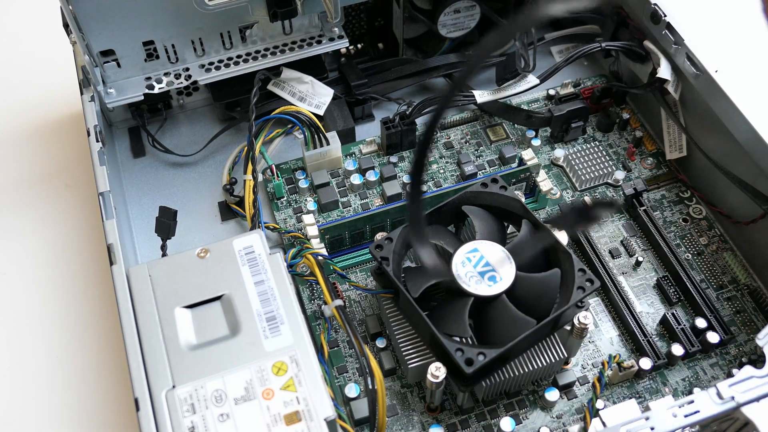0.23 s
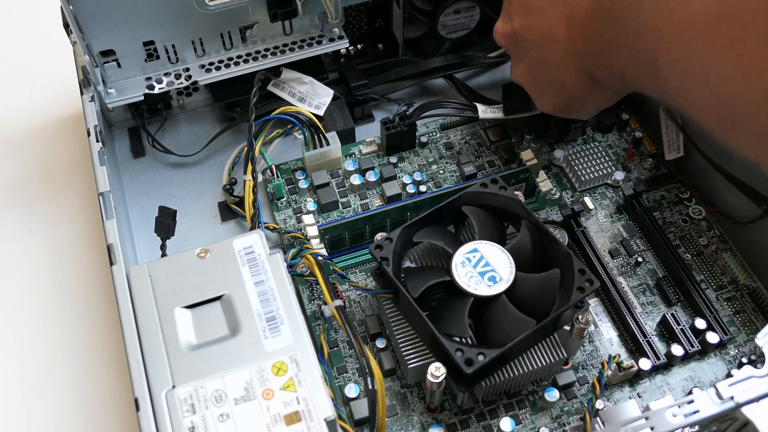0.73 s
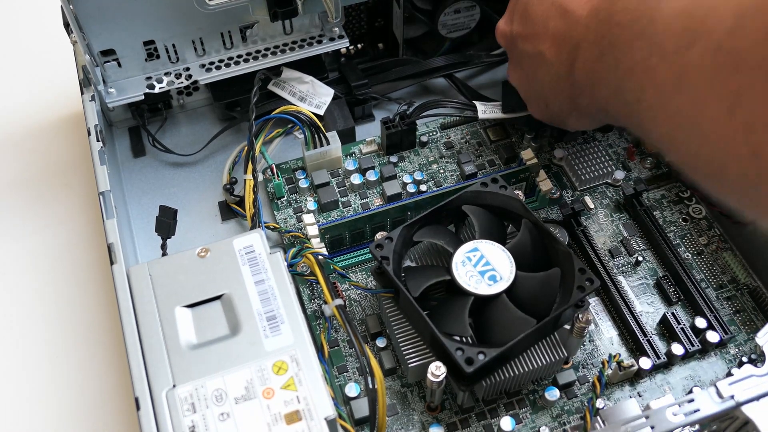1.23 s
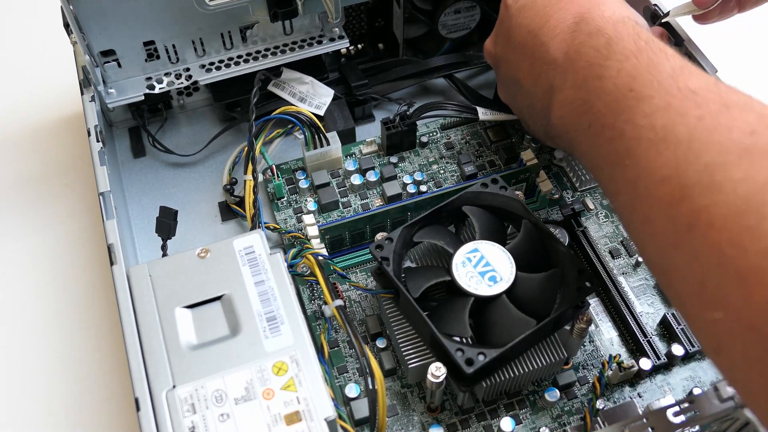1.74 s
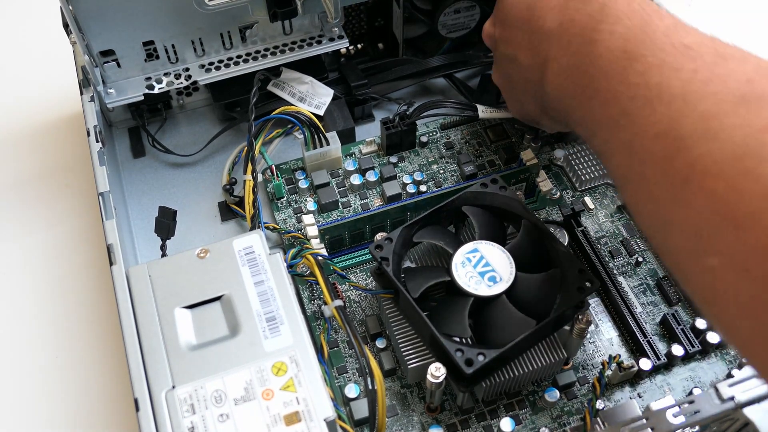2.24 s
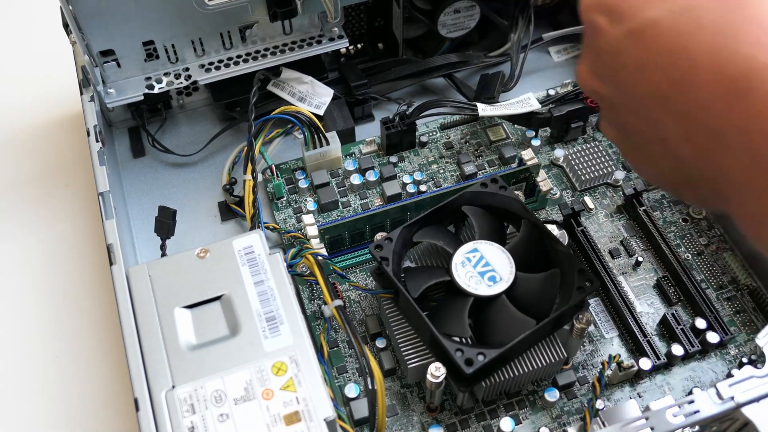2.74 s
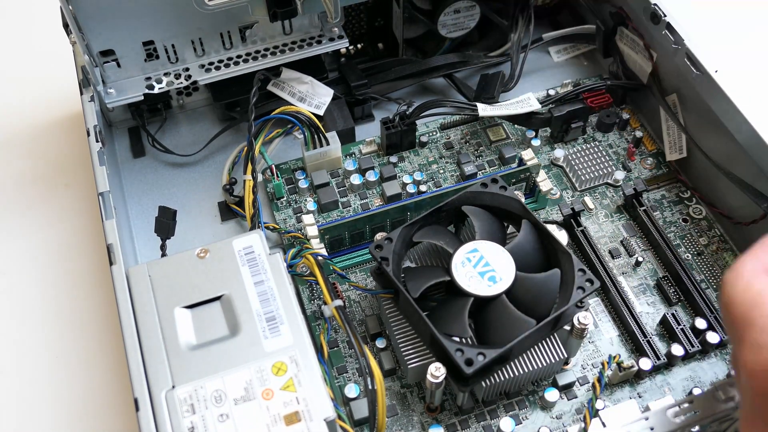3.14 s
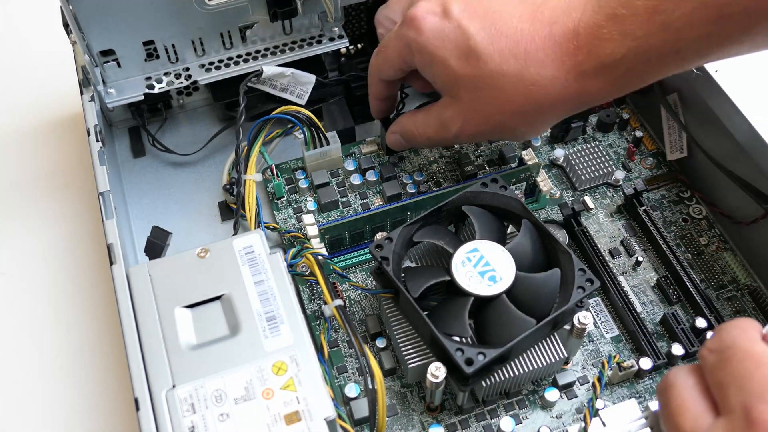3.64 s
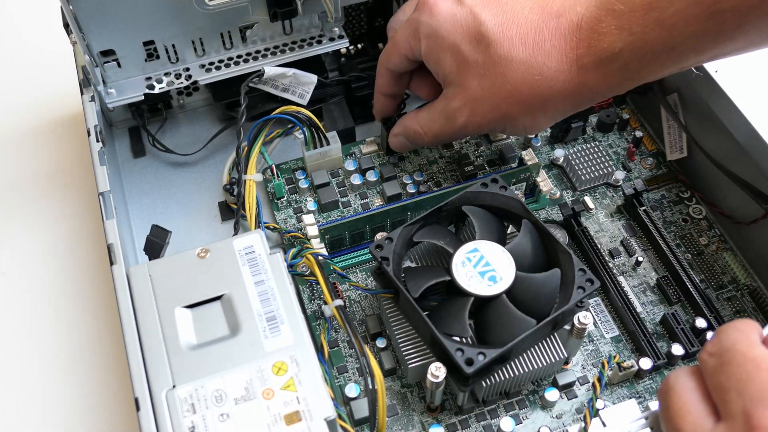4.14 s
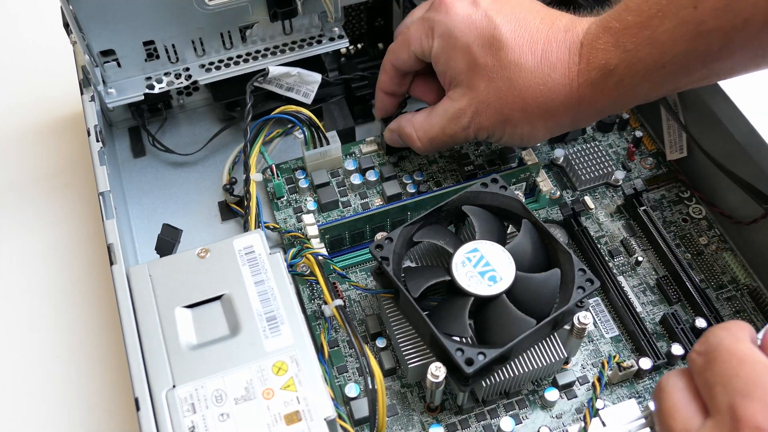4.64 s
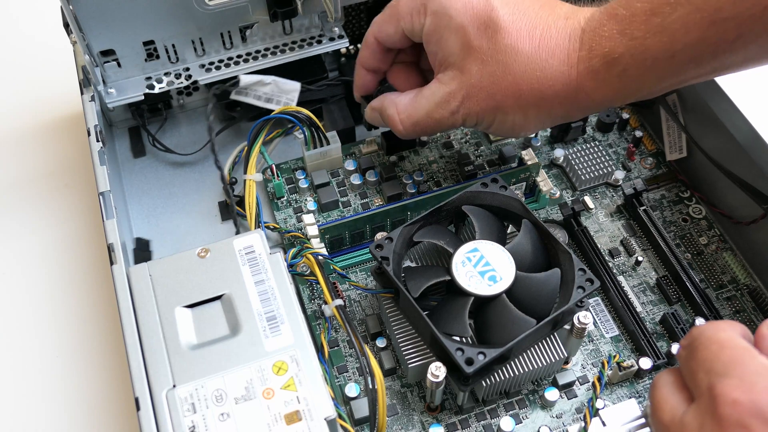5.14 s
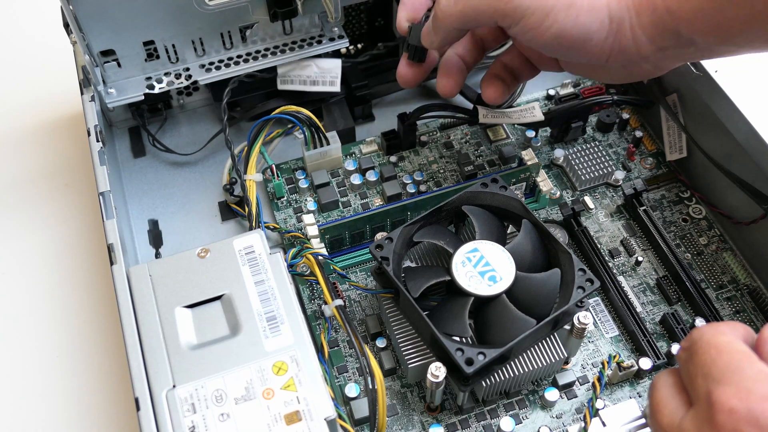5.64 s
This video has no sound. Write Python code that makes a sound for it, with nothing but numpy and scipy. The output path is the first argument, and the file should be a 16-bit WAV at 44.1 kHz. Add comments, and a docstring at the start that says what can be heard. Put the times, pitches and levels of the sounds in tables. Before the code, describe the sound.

Connectors are worked loose from a circuit board in a thin metal case on a desk. Irregular small clicks and dull knocks mix with short finger and cable rubs, then nearly stop in the middle. A firm snap near five seconds opens the loudest part: clacks, low case thuds and a bright rattle at the end. Close stereo microphone, short room echo, soft room noise and faint hum.

```python
"""Plugs snap off a circuit board in an open sheet-metal computer case while hands push the cables aside. Snaps
and taps are rattling bursts of force, strokes are uneven slips over hiss; both shake five parts (case panel,
board, plug shell, latch, pins), and struck or rubbed spots sing at their own pitch. Panels thud, and a low hum
opens the scene, as sagging, uneven swings; sparse echoes, drifting room noise and a faint mains hum lie behind."""
import sys
import numpy as np
from scipy import signal
from scipy.fft import rfft, irfft
from scipy.io import wavfile
from scipy.ndimage import uniform_filter1d

SR = 44100
rng = np.random.default_rng(int(sys.argv[2]) if len(sys.argv) > 2 else 0)


def dump_mix(stems):
    """Bounce the given channels to the path in sys.argv[1] as a 16-bit WAV at rate SR."""
    frames = np.atleast_2d(stems).T  # one column per channel
    limited = np.clip(frames, -1, 1)  # hard clip at full scale
    pcm = np.round(limited * 32767).astype(np.int16)
    wavfile.write(sys.argv[1], SR, pcm)


N = 260190  # samples

# snaps and taps, each a low knock and a high click; levels before the parts colour them, hardness tilts the click:
# start_s, knock_level_db, knock_pitch_hz, click_level_db, click_pitch_hz, hardness_db_per_octave, t60_s
SNAP_EVENTS = [(.548, -54, 603, -92.5, 2000, -1, 0.066), (.587, -50, 900, -87, 2000, -6, 0.047),
               (0.825, -53.5, 840, -64.5, 10100, -13, 0.071), (0.967, -44, 440, -57.5, 6340, -3, 0.079),
               (1.001, -48.5, 453, -78, 4100, -8, 0.043), (1.0875, -53.5, 920, -41.5, 10470, 1, 0.069),
               (1.147, -49.5, 213, -50, 6300, 7, 0.033), (1.202, -52, 1000, -52, 5000, 6.5, 0.045),
               (1.283, -56, 900, -61, 2210, -2, 0.049), (1.313, -43.5, 900, -88, 2000, -2, 0.072),
               (1.335, -44, 895, -67, 2110, -2, 0.054), (1.363, -45.5, 884, -50, 7140, 4, 0.12),
               (1.372, -43, 860, -55, 3900, -6, 0.043), (1.472, -56, 865, -47.5, 4100, 3, 0.056),
               (1.49, -41.5, 1120, -38, 6440, 0.5, 0.071), (1.622, -44, 298, -60.5, 6060, 11.5, 0.018),
               (1.855, -41, 1060, -50.5, 2040, 6, 0.056), (1.8882, -51, 490, -50.5, 4950, 0, 0.03),
               (1.901, -45, 517, -50.5, 1950, -15, 0.066), (1.929, -42, 490, -70, 2430, 0, 0.036),
               (2.001, -48.5, 443, -65, 2140, 12.5, 0.039), (2.232, -35, 814, -42.5, 3270, -4, 0.1),
               (2.244, -54, 895, -57, 2380, -2, .05), (2.257, -51, 920, -49, 3530, -10, 0.04),
               (2.265, -46, 1280, -47.5, 4260, -2, 0.042), (2.28, -54, 1030, -52, 5700, -4, 0.042),
               (2.298, -51.5, 390, -45, 3890, 3, 0.14), (2.316, -52, 396, -48, 7050, -8, 0.053),
               (2.787, -72, 4220, -36, 11800, 15, 0.021), (2.789, -50.5, 7200, -55, 9600, 20.5, 0.054),
               (3.443, -42.5, 840, -55, 1900, 9, 0.043), (3.4719, -50, 490, -55.5, 1880, 8, 0.061),
               (3.529, -45.5, 390, -58.5, 2830, 1, 0.055), (3.633, -50.5, 450, -88, 3770, 0.5, 0.059),
               (3.713, -58, 217, -62.5, 6860, 5, 0.043), (4.873, -49.5, 890, -50.5, 2660, 8, 0.057),
               (4.891, -47, 970, -49.5, 5650, 4, 0.038), (4.925, -47.5, 895, -51.5, 1970, 0.5, 0.063),
               (4.9663, -29, 930, -35.5, 4090, 5, 0.044), (5.084, -35.5, 847, -61, 3040, 16, 0.22),
               (5.101, -38, 308, -43, 2350, 10.5, 0.038), (5.113, -40, 344, -33.5, 3140, 2, 0.027),
               (5.153, -40, 926, -39, 2980, 7, 0.11), (5.2551, -29, 813, -25.5, 4080, -6, 0.094),
               (5.288, -41.5, 896, -37, 1710, 7, 0.079), (5.455, -53, 846, -51, 5400, -3, 0.042),
               (5.554, -52.5, 2930, -37, 4150, 12, 0.13), (5.558, -49, 1346, -39.5, 7400, 3, 0.18),
               (5.707, -54, 1240, -52.5, 4060, 2, 0.14), (5.7356, -42, 477, -43, 4090, 2, 0.12),
               (5.739, -37, 555, -63, 1500, -4, 0.013), (5.749, -34, 820, -57, 2850, -11, 0.024),
               (5.762, -40.5, 820, -66, 2900, -6, 0.065), (5.7815, -39, 820, -37.5, 4870, 4, 0.068),
               (5.786, -40, 934, -44, 4500, -8, 0.053), (5.82, -42, 870, -77, 2300, -6, 0.032),
               (5.83, -45.5, 834, -79, 2300, -6, 0.066), (5.8763, -37.5, 1230, -52, 4900, 10, 0.12),
               (5.8944, -36.5, 1290, -38, 5000, 13.5, 0.5)]
# edges of the ranges of panel, board, shell, latch and pins: edge_hz
PART_EDGES = [110, 600, 1500, 3500, 8500, 15800]
# modes the parts ring with: pitch_hz, relative_level_db, t60_s
PART_MODES = [(316.6, 7.5, 0.53), (466.6, 11.5, 0.13), (792.3, 10, 0.49), (964, 15, 0.009),
              (1293, 7.5, 0.27), (1450, -20, 0.24), (1823, -7.5, 0.07), (2125, 4.5, 0.0059),
              (2540, 7, 0.0054), (2920, -3, 0.038), (4095, -3.5, 0.076), (5200, -5.5, 0.0076),
              (6260, -7.5, 0.015), (7060, -13, 0.035), (9760, -9, 0.01)]
# spectrum of the dull tick of a blow: frequency_hz, relative_level_db
TICK_COLOUR = [(60, -19.5), (150, -10.5), (330, 3.5), (600, 4), (900, 16.5), (1500, -3.5), (4000, -13.5),
               (8000, -15), (12000, -19.5), (15000, -27.5), (16500, -42.5)]
# strokes of fingers and cables, a dull drag and a bright rustle; rise is the time per 10 dB, before its floor:
# full_strength_s, hold_s, rise_s_per_10_db, drag_level_db, drag_pitch_hz, rustle_level_db, rustle_pitch_hz
STROKE_EVENTS = [(0.017, 0.15, 0.06, -87, 263, -69.5, 9000), (0.56, 0.047, -0.07, -62.5, 810, -107, 2960),
                 (0.65, 0.038, -0.22, -58.5, 504, -74, 8100), (.72, 0.084, -0.1, -67, 830, -90, 3370),
                 (1.062, 0.046, -0.26, -61, 900, -60, 6700), (1.132, 0.015, 0.2, -59, 770, -64.5, 4200),
                 (1.295, 0.078, 0.22, -54.5, 444, -64.5, 2180),
                 (1.339, 0.019, 0.1, -52.5, 610, -62.5, 5800), (1.396, 0.048, 0.1, -56, 398, -71, 2880),
                 (1.476, 0.042, 0.04, -50, 840, -55.5, 5800), (1.545, 0.066, 0.14, -60, 330, -65.5, 3060),
                 (1.83, 0.074, -0.02, -56, 534, -58, 3200), (1.951, 0.035, -0.11, -53.5, 330, -76, 2280),
                 (2.116, 0.013, 0.9, -67.5, 513, -92, 4900), (2.177, 0.077, 0.0169, -60, 577, -53, 4200),
                 (2.226, 0.061, 0.014, -50, 730, -48.5, 4240), (2.373, 0.01, 0.5, -64.5, 406, -69.5, 4300),
                 (3.443, 0.082, -0.0659, -54.5, 530, -58, 1480), (4.812, 0.019, 0.4, -64, 915, -78.5, 8000),
                 (4.893, 0.039, 0.0429, -58, 704, -59.5, 3380),
                 (4.99, 0.067, -0.0354, -56, 400, -59.5, 3570),
                 (5.084, 0.081, -0.0089, -47, 520, -49.5, 3900), (5.164, 0.075, -0.09, -51, 505, -53, 7300),
                 (5.33, 0.049, 0.0518, -47.5, 840, -51.5, 2860),
                 (5.429, 0.058, 0.0262, -58.5, 930, -52.5, 3570), (5.748, 0.027, 0, -37, 870, -48, 6860),
                 (5.81, 0.025, 0.13, -48, 840, -77, 2300), (5.9, 0.03, 0.0088, -55, 900, -40, 3600)]
# low murmur of the case while hands rest on it: time_s, level_db
RESTING_MURMUR = [(0, -65.5), (.3, -69), (.52, -74), (.9, -68), (1.7, -67), (2.5, -66), (2.75, -67.5),
                  (3.35, -72), (3.7, -72.5), (4.65, -72.5), (5.0, -56.5), (5.3, -58), (5.55, -66.5),
                  (5.9, -57)]
# low thuds of case and desk, and first the low hum at the start, level before the wobble: start_s, level_db,
# pitch_hz, length_s
THUD_EVENTS = [(0, -63, 103, 0.22), (0.095, -58, 36, 0.1), (1.156, -58, 207, 0.043),
               (1.315, -55, 244, 0.087), (1.539, -43, 213, 0.019), (1.574, -46.5, 196, 0.015),
               (1.59, -57, 457, .025), (1.646, -45.5, 269, 0.017), (3.429, -61.5, 101, 0.11),
               (3.468, -49, 467, 0.027), (3.633, -56.5, 442, 0.02), (4.967, -44, 164, 0.13),
               (4.972, -41.5, 297, 0.065), (5.083, -38.5, 335, 0.032), (5.096, -51.5, 78, 0.06),
               (5.106, -36, 317, 0.044), (5.09, -40.5, 218, 0.12)]
# dying time of the echoes: frequency_hz, t60_s
ECHO_DECAY = [(200, 0.18), (600, 0.23), (1400, 0.28), (3700, 0.21), (9700, 0.14)]
# colour of the echoes between left and right: frequency_hz, relative_level_db
ECHO_WIDTH = [(100, -5), (200, 0), (400, -5), (1000, -11), (4000, -13), (10000, -11.5), (15000, -3)]
# spectrum of the room noise in the centre: frequency_hz, relative_level_db
ROOM_COLOUR = [(15, -69), (25, -36), (65, -15.5), (114, 1.5), (181, -15.5), (207, 0.5), (303, -3),
               (329, 3.5), (419, -9), (480, -1.5), (826, -8), (946, -3), (2190, -18), (15000, -23.5),
               (16300, -61)]
# room noise at the sides against the centre: frequency_hz, relative_level_db
ROOM_WIDTH = [(60, 1), (180, 9), (550, 6), (1650, 3.5), (4970, -2.5), (15000, -6.5)]
# mains harmonics before the swell: pitch_hz, level_db
HUM_HARMONICS = [(200, -85.5), (300, -80.5)]
# gain of the hum over time: time_s, gain_db
HUM_GAIN = [(0, 12.5), (.3, 13), (.55, 3), (5.9, 7.5)]

# loss towards lower and towards higher parts, dB per octave from the pitch of the force
KNOCK_LOSS_DB, CLICK_LOSS_DB = (6, 10), (5, 15)
DRAG_LOSS_DB, RUSTLE_LOSS_DB = (9.5, 11.5), (4, 8.5)
RESTING_HZ, RESTING_LOSS_DB = 242, (0, 9)
# snaps weaker than this level rise more slowly: dB of rise time per dB
SHARP_DB, SLOWER_PER_DB = -31.5, 0.66
SHORTEST_T60 = .01  # s, no snap dies faster
KNOCK_RING, CLICK_RING = .6, .28  # ring of the struck spot, in dying times of its snap
SPOT_SPREAD = .07  # spread of its side modes, as a share of the pitch
BIGGEST_SLIP = 3.5  # cap on a slip, in steps of the spread
FASTEST_RISE = .012  # s per 10 dB, no stroke rises faster
FADE_RATIO = 0.65  # fade time of a stroke as a multiple of its rise time
# singing of the rubbed spot and broad hump of the rubbed sleeve: level against the rustle in dB, sharpness Q
SQUEAK_DB, SQUEAK_Q = -21, 100
SCRAPE_DB, SCRAPE_Q = -13, 5.6
SAG = 0.087  # a thud starts this share above its pitch and ends as far below
WOBBLE, WOBBLE_CYCLES = 0.44, 2.58  # depth of a thud's unevenness, cycles between its random points
ROOM_DB = -67  # rms of the room noise in the centre
EDGE_HZ = 16400  # upper band limit


def amp(db):
    """Decibels to linear gain."""
    return 10 ** (np.asarray(db) / 20)


def evened(x):
    """Scales to an rms of 1."""
    return x / np.sqrt(np.mean(x ** 2) + 1e-20)


def read(points, hz):
    """Reads a frequency table between its points, on a logarithmic pitch scale."""
    f, value = np.transpose(points)
    return np.interp(np.log(hz + 1), np.log(f + 1), value)


def curve(rows):
    """Draws each column of a time table as a line over the whole scene."""
    s, *columns = np.transpose(rows)
    return np.array([np.interp(np.arange(N) / SR, s, c) for c in columns])


def add(mix, s, sound):
    """Lays a sound into the mix at s seconds, cut at the end."""
    part = mix[:, round(s * SR):][:, :sound.shape[1]]
    part += sound[:, :part.shape[1]]


def coloured(x, points):
    """Applies a spectrum without delay."""
    return irfft(rfft(x) * amp(read(points, np.fft.rfftfreq(len(x), 1 / SR))), len(x))


def snaps(knock_spot_db=-5.5, click_spot_db=-3.5, kick=1.14):
    """Each snap is a kick and a dying rattle of forces; heavy parts and weak snaps start more slowly."""
    force, spots, t = np.zeros((5, N)), np.zeros((1, N)), np.arange(6000) / SR
    part_rise_s = np.array([[.003], [.0018], [.0012], [.0009], [.0005]])
    for s, knock_db, knock_hz, click_db, click_hz, hard_db, t60 in SNAP_EVENTS:
        t60 = max(t60, SHORTEST_T60)
        decay = amp(-60 * t / t60) * (1 + kick * np.exp(-t / 0.003))
        rattle = rng.standard_normal(len(t)) * decay
        # separate contacts lift and lower the rattle
        contacts = evened(uniform_filter1d(rng.standard_normal(len(t)), size=24))
        rattle = rattle * amp(3.0 * np.tanh(contacts))
        rattle = rattle / np.std(rattle[:640])  # the levels hold for the opening burst
        weakness_db = max(SHARP_DB - max(knock_db, click_db), 0)
        rise_s = part_rise_s * amp(SLOWER_PER_DB * weakness_db)
        pushes = rattle * (1 - np.exp(-t / rise_s))
        knock = shared(knock_db, knock_hz, KNOCK_LOSS_DB)
        click = shared(click_db, click_hz, CLICK_LOSS_DB, hard_db)
        add(force, s, np.hypot(knock, click) * pushes)
        # the board's push rings the knock, the latch's push rings the click
        add(spots, s, amp(knock_db + knock_spot_db) * spot(pushes[1], knock_hz, KNOCK_RING * t60))
        add(spots, s, amp(click_db + click_spot_db) * spot(pushes[3], click_hz, CLICK_RING * t60))
    return force, spots[0]


def spot(force, hz, t60):
    """The place that is struck rings briefly at its own pitch, with two weaker modes near it."""
    t = np.arange(len(force)) / SR
    near = hz * (1 + SPOT_SPREAD * rng.standard_normal((2, 1)))
    modes = np.sin(2 * np.pi * hz * t) + .5 * np.sin(2 * np.pi * near * t).sum(axis=0)
    ring = amp(-60 * t / t60) * modes
    return signal.fftconvolve(force, ring / np.linalg.norm(ring))[None, :len(t)]


def shared(db, hz, loss_db, tilt_db=0):
    """Gain of each part, most at the pitch of the force; a hard one tilts to the treble, a soft one loses it."""
    edges = np.array(PART_EDGES)
    octaves = np.log2(np.sqrt(edges[1:] * edges[:-1]) / hz)
    fall_db = np.where(octaves < 0, -loss_db[0], loss_db[1]) * octaves
    hard_db = np.maximum(tilt_db, 0) * octaves
    soft_db = min(tilt_db, 0) * np.maximum(octaves, 0)
    return amp(db - fall_db + fall_db.min() + hard_db + soft_db)[:, None]


def parts(ring_db=-5.0):
    """Impulse response of each part: a dull tick plus its modes, energy 1."""
    t = np.arange(8192) / SR
    full = np.abs(np.fft.fftfreq(len(t), 1 / SR))
    log_gain = np.log(amp(read(TICK_COLOUR, full)))
    # minimum phase puts the tick's energy at its start
    tick = np.fft.ifft(np.exp(log_gain - 1j * signal.hilbert(log_gain).imag)).real
    rings = sum(amp(db - 60 * t / t60) * np.sin(2 * np.pi * hz * t) / np.sqrt(t60)
                for hz, db, t60 in PART_MODES)
    whole = evened(tick) + amp(ring_db) * evened(rings)
    bands = [signal.butter(3, edge, "bandpass", fs=SR, output="sos")
             for edge in zip(PART_EDGES, PART_EDGES[1:])]
    shapes = np.array([signal.sosfilt(band, whole) for band in bands])
    return shapes / np.linalg.norm(shapes, axis=1, keepdims=True)


def rubbing(slips_per_s=3000, spread_db=2.0, hiss=0.98):
    """Tiny uneven slips over a smooth hiss of skin and insulation."""
    sizes = amp(spread_db * np.minimum(rng.exponential(1, N), BIGGEST_SLIP))
    slips = sizes * (rng.random(N) < slips_per_s / SR)
    clumps = amp(2.5 * evened(uniform_filter1d(rng.standard_normal(N), 400)))
    signs = rng.choice([-1., 1.], N)
    force = evened(slips * signs * clumps) + hiss * rng.standard_normal(N)
    return strokes(shifting(force, 5.16))


def shifting(x, patchy_db):
    """Moving fingers damp some resonances and free others: narrow patches lasting a few hundredths of a second."""
    z = signal.stft(x, nperseg=256, noverlap=192)[2]
    patches = rng.standard_normal(z.T.shape).T
    patches = uniform_filter1d(patches, size=2, axis=0)
    patches = evened(uniform_filter1d(patches, size=24, axis=1))
    return evened(signal.istft(z * amp(patchy_db * patches), nperseg=256, noverlap=192)[1][:len(x)])


def strokes(force):
    """How hard each part is rubbed: every stroke rises, holds and fades over the resting murmur."""
    t, squeak = np.arange(N) / SR, np.zeros(N)
    power = (shared(0, RESTING_HZ, RESTING_LOSS_DB) * amp(curve(RESTING_MURMUR))) ** 2
    for s, hold, rise, drag_db, drag_hz, rustle_db, rustle_hz in STROKE_EVENTS:
        # time outside the hold, with the fade on its own clock
        away = np.maximum(np.maximum(s - t, (t - s - hold) / FADE_RATIO), 0)
        shape = amp(-10 * away / max(rise, FASTEST_RISE))
        drag = shared(drag_db, drag_hz, DRAG_LOSS_DB)
        rustle = shared(rustle_db, rustle_hz, RUSTLE_LOSS_DB)
        power = power + (drag ** 2 + rustle ** 2) * shape ** 2
        for db, sharp in (SQUEAK_DB, SQUEAK_Q), (SCRAPE_DB, SCRAPE_Q):
            singing = signal.lfilter(*signal.iirpeak(rustle_hz, sharp, SR), force)
            squeak += amp(rustle_db + db) * shape * evened(singing)
    return np.sqrt(power) * force, squeak


def thuds():
    """A heavy panel swings up quickly and settles more slowly, its pitch sagging, its swing uneven; the low hum
    at the start is made the same way."""
    out = np.zeros((1, N))
    for s, db, hz, length in THUD_EVENTS:
        u = np.arange(0, 1, 1 / (length * SR))  # 0 to 1 over the thud
        cycles = hz * length
        knots = rng.standard_normal((24, 2)) @ [1, 1j]
        wobble = np.interp(u * cycles / WOBBLE_CYCLES, np.arange(len(knots)), knots)
        turns = cycles * (u + SAG * u * (1 - u)) + rng.random()
        swing = ((1 + WOBBLE * wobble) * np.exp(2j * np.pi * turns)).imag
        envelope = np.sin(np.pi * u ** 0.56) ** 1.35
        add(out, s, amp(db) * (envelope * swing)[None])
    return out[0]


def echoes(x):
    """Case and room answer with sparse taps of random sign, each band dying at its own speed."""
    taps = np.zeros(SR // 2)
    at = np.arange(60, len(taps) - 12, 12)
    taps[at + rng.integers(0, 12, len(at))] = rng.choice([-1., 1.], len(at))
    hz, t, z = signal.stft(taps, SR, nperseg=256)
    decay = amp(-60 * t / read(ECHO_DECAY, hz)[:, None])
    tail = signal.istft(z * decay, SR, nperseg=256)[1]
    return signal.fftconvolve(x, tail / np.linalg.norm(tail))[:N]


def room(patchy_db=2.5):
    """Distant noise with drifting patches; the noise in centre and sides is unrelated."""
    frames, hz = N // 256 + 5, np.fft.rfftfreq(1024, 1 / SR)
    a, b, c, d, patches = rng.standard_normal((frames, 513, 5)).T
    patches = uniform_filter1d(patches, 8, axis=0)
    patches = evened(uniform_filter1d(patches, 20, axis=1))
    z = np.array([a + 1j * b, (c + 1j * d) * amp(read(ROOM_WIDTH, hz))[:, None]])
    z = z * amp(read(ROOM_COLOUR, hz)[:, None] + patchy_db * patches)
    noise = signal.istft(z, nperseg=1024, noverlap=768)[1][:, :N]
    return amp(ROOM_DB) * noise / np.std(noise[0])


def hum():
    """Mains harmonics that waver a little under a slow change of level."""
    t = np.arange(N) / SR
    waver = amp(0.41 * evened(uniform_filter1d(rng.standard_normal(N), 4000)))
    tones = sum(amp(db) * np.sin(2 * np.pi * hz * t) for hz, db in HUM_HARMONICS)
    return amp(curve(HUM_GAIN)[0]) * waver * tones


def scene():
    """Shakes the parts with blows and rubs, then sets them in the stereo room."""
    blows, spots = snaps()
    rubs, squeak = rubbing()
    shaken = signal.fftconvolve(blows + rubs, parts(), axes=1)[:, :N].sum(axis=0)
    near = spots + squeak + shaken
    # small parts radiate no bass
    near = signal.sosfilt(signal.butter(3, 130, "highpass", fs=SR, output="sos"), near)
    centre, sides = room()
    low = thuds()
    centre = centre + near + amp(-7.0) * echoes(near) + hum() + low
    wide = coloured(echoes(near + amp(-10.0) * low), ECHO_WIDTH)
    sides = sides + amp(-22.5) * near + amp(1.5) * wide  # the near sound leans slightly right
    return np.array([centre - sides, centre + sides])


def record(dry):
    """Band limit: a steep low-pass at the upper edge."""
    lowpass = signal.firwin(511, EDGE_HZ, window=("kaiser", 9), fs=SR)
    return signal.oaconvolve(dry, lowpass[None], "same")


dry = scene()
out = record(dry)
dump_mix(out)
```